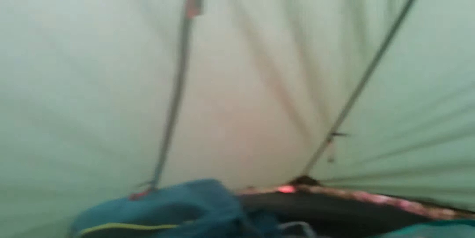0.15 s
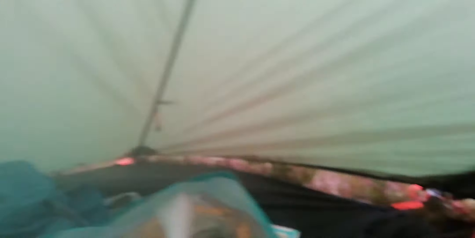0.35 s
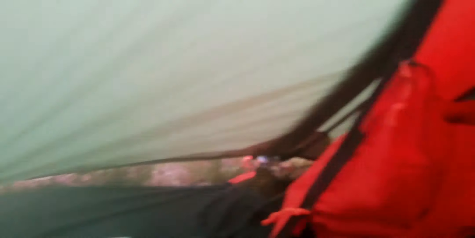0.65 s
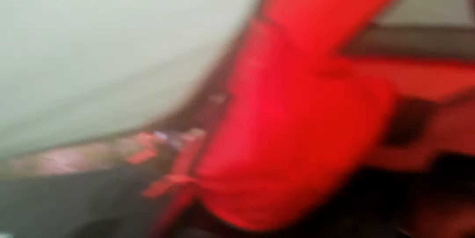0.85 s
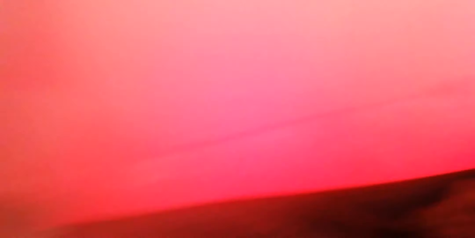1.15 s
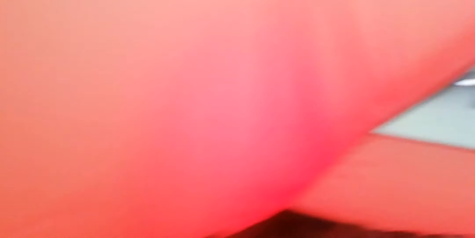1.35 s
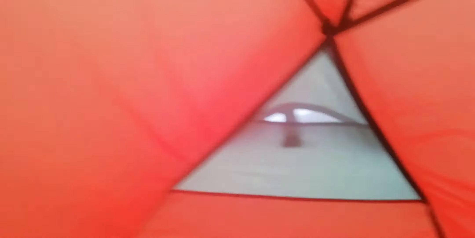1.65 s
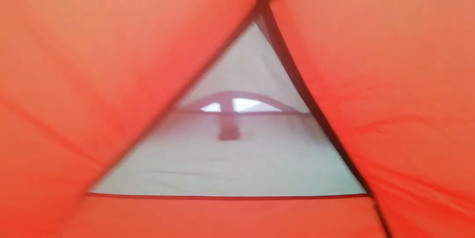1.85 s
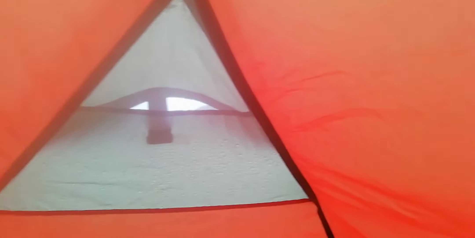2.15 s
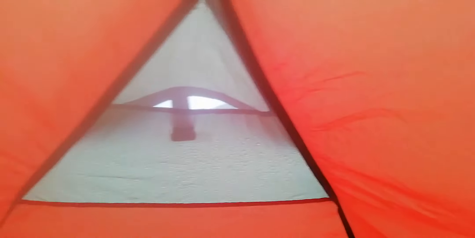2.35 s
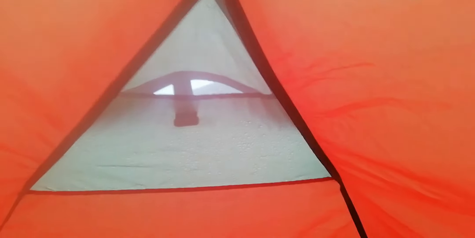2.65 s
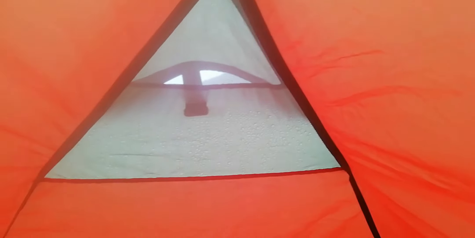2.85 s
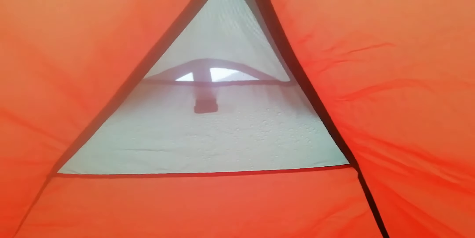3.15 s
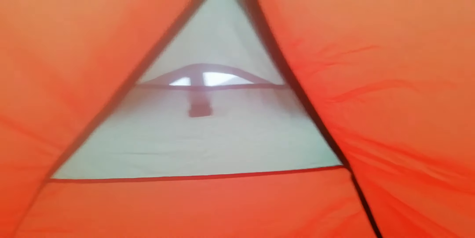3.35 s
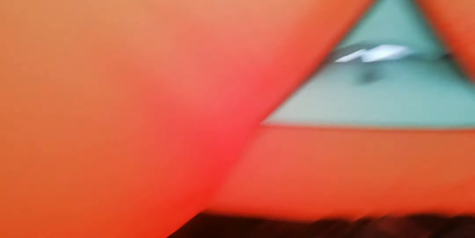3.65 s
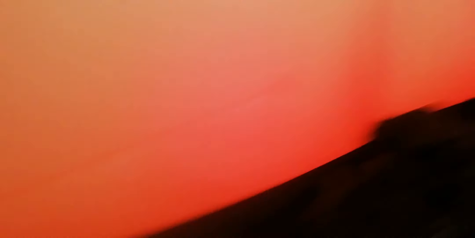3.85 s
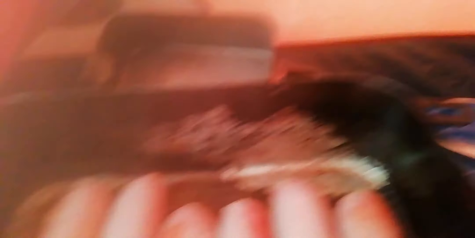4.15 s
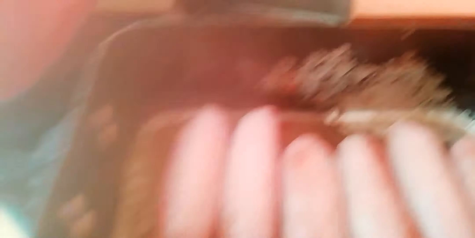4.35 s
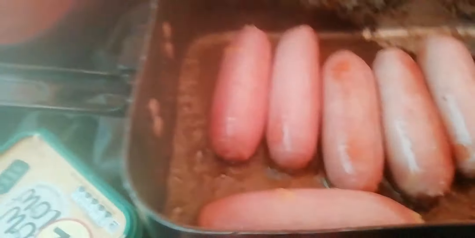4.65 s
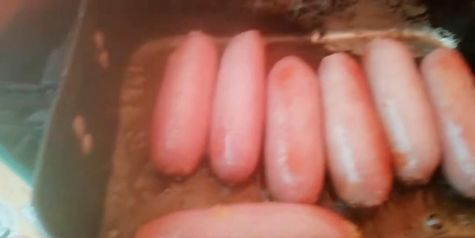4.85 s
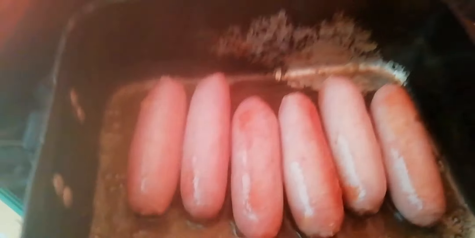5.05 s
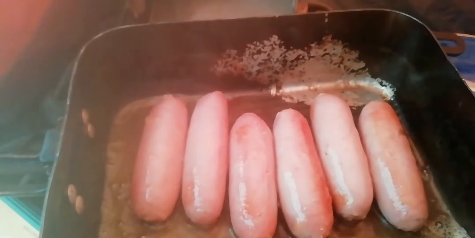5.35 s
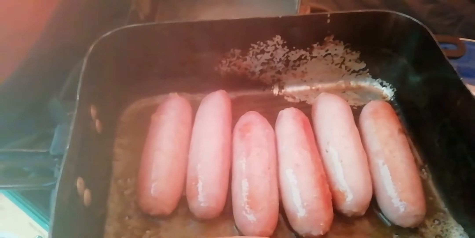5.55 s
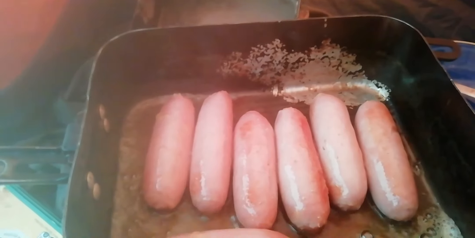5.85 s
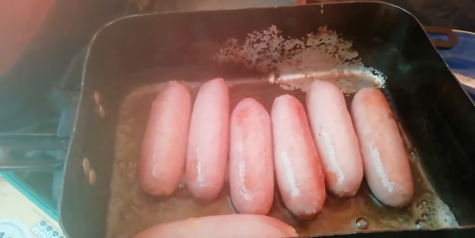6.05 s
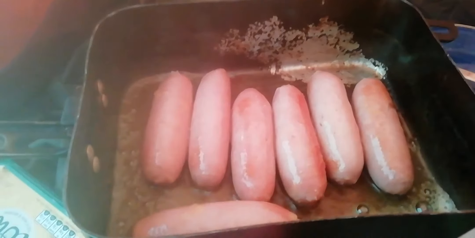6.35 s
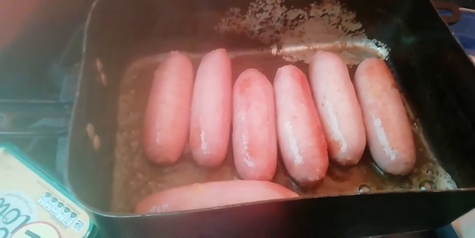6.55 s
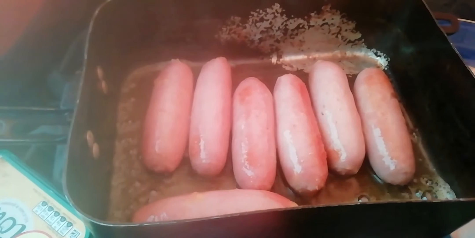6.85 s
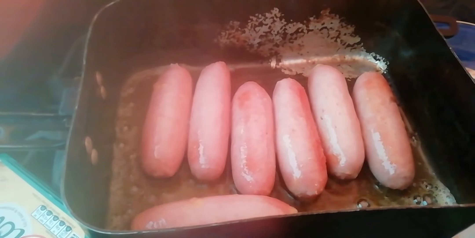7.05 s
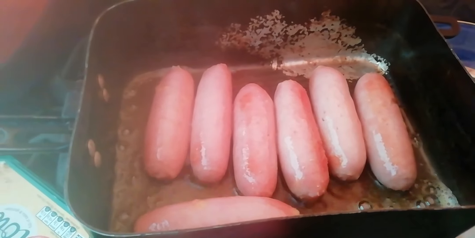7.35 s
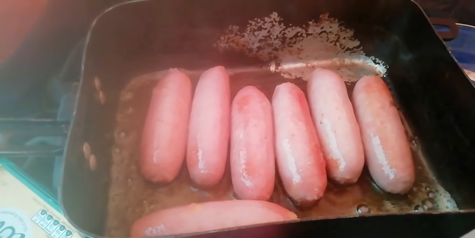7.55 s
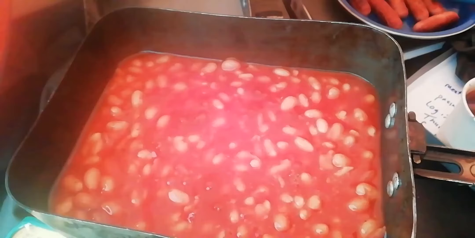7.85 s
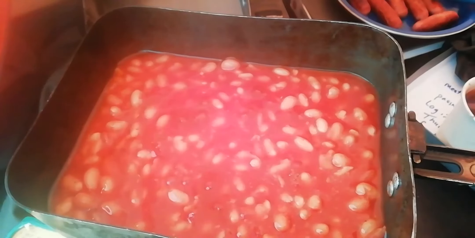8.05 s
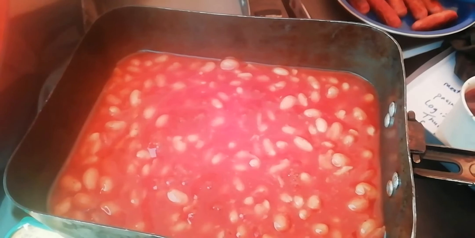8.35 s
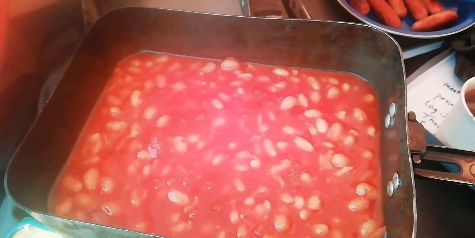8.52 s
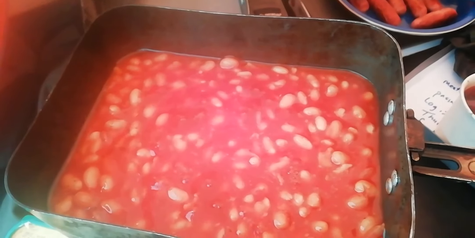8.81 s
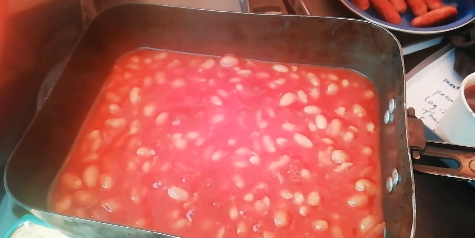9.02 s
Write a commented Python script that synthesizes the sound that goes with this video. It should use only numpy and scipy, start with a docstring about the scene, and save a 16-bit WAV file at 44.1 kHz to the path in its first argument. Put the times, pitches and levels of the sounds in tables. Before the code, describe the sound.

A hand-held phone inside a fabric tent. From 0 s a low, wavering gas flame roars under faint sizzling; frying and tiny sharp spits grow quickly, strongest around 1.0-1.25 s. At 1.3 s a soft low bump, then the sizzle falls away, dull and diffuse by way of the tent fabric, with a few isolated ticks and the flame's roar until 3.7 s. At about 3.9-4.0 s several low grip thumps over a short rumble; the sizzle jumps back, peaking near 4.3 s, close and brighter. Dense crackles, snaps and steamy hiss continue to 7.75 s with brief dips. Complete silence until 8.2 s. A very low swell dies away quickly and the burner alone remains to the end: deep roar, light hiss, faint thin whistles. Left is bright, right dull.

```python
"""Sausages fry on a gas camping stove inside a tent, heard by a hand-held phone.
First the phone turns to the pan: noise puffs make the sizzle, short bursts the spits, over a low flame roar.
Then it swings away and back, with grip thumps over handling rumble; the frying fades and returns brighter.
After a short silence a low swell dies away and only the burner is heard under a pot: roar, hiss, whistles.
The left microphone port is bright, the right one dull."""
import sys
import numpy as np
from scipy import signal
from scipy.fft import rfft, irfft
from scipy.io import wavfile
from scipy.ndimage import uniform_filter1d, map_coordinates

SR = 44100
rng = np.random.default_rng(int(sys.argv[2]) if len(sys.argv) > 2 else 0)


def transcribe(signal):
    """Save signal, clipped to [-1, 1], as a 16-bit WAV file at the path in sys.argv[1]."""
    frames = np.atleast_2d(signal).T
    limited = np.clip(frames, -1, 1)
    pcm = np.round(limited * 32767).astype(np.int16)
    wavfile.write(sys.argv[1], SR, pcm)


def voltage_ratio(level):
    """Linear amplitude factor for a level in decibels (scalar or array-like)."""
    return 10 ** (np.asarray(level, float) / 20)


N = 404838

# level course of the sizzle, before lulls and a final trim: time_s, level_db
SIZZLE_LEVEL = [(0.0, -45.5), (0.97, -38.5), (1.17, -37), (1.38, -43), (3.84, -41.5), (4.1, -36),
                (4.27, -30), (4.32, -36.5), (4.88, -33.5), (5.16, -34.5), (5.35, -32), (6.04, -36.5),
                (6.22, -33.5), (7.29, -36), (7.75, -35.5)]
# how squarely the phone faces the pan: time_s, share (0-1)
FACING_PAN = [(0, 0.08), (.4, 0.66), (.8, 0.57), (1.2, 0.96), (1.45, 0.3), (3.7, 0), (4, 0.93), (7.7, 0.92)]
# loudest spits of fat: start_s, level_db (relative), pitch_hz, length_ms
LOUD_SPITS = [(0.122, -36, 5030, 6), (0.1695, -33.5, 5460, 2.4), (0.219, -33, 7550, 3),
              (0.287, -35, 3950, 2), (0.479, -31, 4650, 1.5), (0.555, -28.5, 8800, 0.61),
              (0.599, -33, 4080, 2.8), (0.7953, -31.5, 4500, 3.4), (0.84, -30, 6800, 5.4),
              (0.8444, -25.5, 5000, 1.2), (0.8765, -32, 7200, 3), (0.902, -31.5, 5100, 2.5),
              (0.9578, -37, 4240, 3), (0.999, -21, 7500, 0.73), (1.008, -30.5, 4640, 3.8),
              (1.0382, -34, 4700, 3), (1.1055, -30.5, 9000, 1.8), (1.1392, -27, 2560, 1.8),
              (1.1543, -17.5, 8100, 0.6), (1.173, -23.5, 6200, 0.96), (1.181, -26, 8180, 1.7),
              (1.2128, -29, 8550, 2.9), (1.2587, -28, 9300, 2.5), (1.2943, -30, 2630, 1.8),
              (1.486, -28.5, 6800, 1.6), (1.7865, -34, 2960, 3.5), (2.32, -33.5, 4800, 2.1),
              (2.785, -34, 5980, 2.6), (3.028, -30.5, 6250, 1.9), (3.9093, -32, 7970, 1.4),
              (3.937, -27.5, 6130, 1.7), (3.9806, -27.5, 8770, 4.8), (4.0468, -23, 4500, 4.1),
              (4.0565, -27.5, 4160, 3.0), (4.0637, -19.5, 3880, 0.53), (4.067, -29.5, 2730, 5.0),
              (4.09, -19, 8100, 1.1), (4.1035, -24, 7500, 1.4), (4.128, -25.5, 8000, 1.2),
              (4.201, -25, 8840, 1.5), (4.22, -24, 8600, 2.3), (4.2247, -24, 4940, 1.2),
              (4.238, -23, 4060, 1.1), (4.255, -23.5, 7700, 2), (4.263, -26, 6800, 2.3),
              (4.3871, -28.5, 6860, 2), (4.4226, -28, 7600, 2), (4.5348, -26.5, 4140, 2.3),
              (4.599, -27, 1850, 3.7), (4.6216, -32, 5900, 1.2), (4.643, -24.5, 2660, 7.7),
              (4.6801, -25.5, 1970, 6), (4.715, -31, 5510, 6), (4.7267, -23, 5900, 1.7),
              (4.779, -24.5, 6000, 1.7), (4.875, -24.5, 8400, 1.1), (4.882, -26, 8300, 1.2),
              (4.9154, -28, 4800, 4), (4.9683, -28.5, 5550, 2), (5.0486, -28, 4430, 2.5),
              (5.1214, -25, 9000, 3.1), (5.1913, -28, 7900, 2), (5.2455, -24.5, 7000, 2.4),
              (5.2567, -28, 6900, 1.2), (5.34, -29, 4500, 3), (5.3519, -26.5, 7000, 3),
              (5.464, -25, 7920, 1.2), (5.4971, -32.5, 4287, 2), (5.5158, -26.5, 7800, 0.81),
              (5.5649, -29.5, 3870, 6.3), (5.5983, -24, 6060, 1.6), (5.642, -28, 4037, 2.8),
              (5.704, -24, 4600, 2.7), (5.8044, -31, 4660, 2.5), (5.8264, -29, 4440, 5.8),
              (5.8548, -35.5, 2260, 13), (5.8997, -29, 7900, 2), (5.9346, -27, 7644, 1.1),
              (6.0676, -32, 1640, 7.6), (6.1347, -26, 7530, 2), (6.156, -29.5, 3240, 3.2),
              (6.169, -25, 6590, 1.6), (6.2196, -17, 8600, 0.75), (6.3134, -25.5, 7840, 1.5),
              (6.3443, -23.5, 3850, 1.2), (6.3975, -25.5, 8090, 0.97), (6.426, -25, 7700, 1.1),
              (6.4396, -25.5, 5500, 3.8), (6.485, -22.5, 8400, 0.85), (6.496, -25.5, 6500, 0.83),
              (6.668, -24, 4587, 2.6), (6.7273, -29, 7550, 2), (6.747, -29.5, 4500, 3),
              (6.8411, -27.5, 7800, 2), (6.851, -26, 4700, 1.5), (6.921, -29.5, 5000, 2),
              (6.9898, -24, 8200, 2.7), (7.085, -21.5, 7990, 2), (7.129, -22, 8140, 1),
              (7.1815, -23.5, 3850, 2.2), (7.277, -22.5, 4170, 1.6), (7.302, -29, 8300, 5),
              (7.3465, -28, 7960, 2.9), (7.392, -21.5, 7900, 0.62), (7.407, -29.5, 4300, 4),
              (7.48, -36.5, 1600, 11), (7.528, -34.5, 5000, 3), (7.5847, -23.5, 5100, 1.5),
              (7.6158, -23.5, 6670, 1.9), (7.695, -29, 7960, 2), (7.74, -26.5, 6450, 3)]
# fingers shifting on the phone: centre_s, peak_db, pitch_hz
GRIP_THUMPS = [(1.302, -30, 65), (3.878, -19, 111), (3.936, -24, 167), (3.962, -19, 150), (4.003, -25, 99)]
# colour of the pan heard head-on (relative): frequency_hz, left_db_per_hz, right_db_per_hz
PAN_HEAD_ON = [(600, -88, -88), (1100, -79, -77), (1600, -76, -69), (2000, -77, -74), (2700, -73, -81),
               (3400, -71, -77), (4400, -65, -67), (5600, -65, -79), (7200, -63, -80), (8200, -62, -86),
               (9200, -65, -90), (10500, -77, -92), (12000, -82, -99), (15500, -92, -102)]
# colour of the pan heard by way of the tent fabric (relative): frequency_hz, left_db_per_hz, right_db_per_hz
PAN_ECHOED = [(350, -76.5, -78.5), (606, -76.5, -77), (910, -73.5, -73.5), (1270, -74, -75),
              (1660, -71, -71.5), (2200, -73, -74), (3500, -75, -82), (5770, -77.5, -90.5),
              (8300, -71, -97), (9300, -78.5, -99), (11230, -86.5, -106), (15400, -100, -114)]
# colour of the flame; its roar is levelled apart: frequency_hz, left_db_per_hz, right_db_per_hz
FLAME_COLOUR = [(38.3, -86.5, -86.5), (111, -70, -70.5), (288, -74, -74.5), (528, -90, -89.5),
                (940, -82, -81.5), (1500, -82.5, -82), (2040, -91.5, -84.5), (2730, -88.5, -91.5),
                (4500, -91.5, -96.5), (6000, -94, -104.0), (7200, -92, -108.0), (9000, -88, -109.0),
                (10100, -101.0, -113.0), (11500, -103.0, -114.0), (16000, -117.0, -120.0)]
# faint whistles of the gas jet: pitch_hz, width_hz, left_db, right_db
JET_WHISTLES = [(1900, 66, -59.5, -66.5), (6010, 120, -65, -83), (11450, 120, -80.5, -91.5)]
# how alike the two ports sound: frequency_hz, likeness (0-1)
PORT_LIKENESS = [(30, 0.77), (100, 1), (250, 0.97), (400, 0.57), (600, 0.11), (1200, 0.35), (4000, 0.047),
                 (9000, 0.15)]
# the silence: start_s, end_s
SILENCE_SPAN = (7.756, 8.218)
# brief dips of the sizzle: lowest_s, depth_db
SIZZLE_LULLS = [(4.83, 8), (5.31, 6.5), (5.44, 8), (6.25, 7.5), (6.58, 8), (7.47, 3.5)]
# level of the flame's upper roar: time_s, level_db
UPPER_ROAR_LEVEL = [(0.0, -43), (1.2, -50.5), (1.84, -42.5), (3.7, -46), (4.1, -49.5), (5.5, -47.5)]
# handling rumble: turn_s, db_at_turn, climb_db_per_s before the turn (negative sinks), fall_db_per_s after
HANDLING_RUMBLE = [(1.3, -53, -2, 110), (3.92, -34, 133, 123.5)]
# how much later the pan reaches the right port: time_s, lag_ms
PAN_LAG = [(0, 0.54), (3.7, 0.59), (4.2, 0.16)]

HZ = np.fft.rfftfreq(N, 1 / SR) + 1e-3
LULL_SINK_S, LULL_BACK_S = 0.081, 0.061
DEEP_ROAR_DB, DEEP_LIFT_DB = -47, 1.5   # phone turned away; added as it faces the pan
SMALL_SPITS, SMALL_SPIT_DB = 260, 2   # tries left to chance; least level over the sizzle's course
SNAP = 2.9   # first snap of a spit of 1 ms, over its noise
TICK_SHARE, TICK_FADE_DB_PER_MS = 0.61, 15.5   # bright opening tick of a spit of 1 ms; less for longer ones
BURNER_LEAD_MS = 0.58   # the flame reaches the right port first


def rms_one(x):
    """Bring a sound to an RMS of 1."""
    return x / np.sqrt(np.mean(x ** 2) + 1e-20)


def in_time(rows):
    """Draw every column of a time table as a curve over the scene."""
    s, *columns = np.transpose(rows)
    return [np.interp(np.arange(N) / SR, s, c) for c in columns]


def at_hz(points, hz):
    """Read every column of a colour table on a log-frequency axis."""
    table = np.array(points)
    return np.array([np.interp(np.log(hz), np.log(table[:, 0]), c) for c in table[:, 1:].T])


def drift(rate_hz):
    """Slow random wander of spread 1, made on every 40th sample."""
    pole = np.exp(-80 * np.pi * rate_hz / SR)
    noise = rng.standard_normal(N // 40 + 2002)
    slow = signal.lfilter([1], [1, -2 * pole, pole * pole], noise)[2000:]
    return np.interp(np.arange(N) / 40, np.arange(len(slow)), rms_one(slow))


def band(x, low_hz, high_hz, order=2):
    """Keep only the sound between two frequencies."""
    edges_hz = [low_hz, min(high_hz, .45 * SR)]
    return signal.sosfilt(signal.butter(order, edges_hz, "band", fs=SR, output="sos"), x)


def ports(pair):
    """Spectra at both ports: the right hears part of the left's sound, the rest by other paths."""
    first, other = rfft(pair)
    alike = np.clip(at_hz(PORT_LIKENESS, HZ)[0], 0, 1)
    return np.array([first, alike * first + np.sqrt(1 - alike ** 2) * other])


def coloured(spectra, colour):
    """Colour each port; from unit white noise, 0 dB per Hz gives a power of 1 per Hz."""
    return irfft(spectra * voltage_ratio(at_hz(colour, HZ)) * np.sqrt(SR / 2), N)


def later(pair, lag_ms):
    """Sound off to one side reaches the right port later, or earlier if the lag is negative."""
    read_at = np.arange(N) - lag_ms * SR / 1000
    return np.array([pair[0], map_coordinates(pair[1], [read_at], order=3, mode="nearest")])


def burner():
    """Turbulent flame: a low roar in two bands, gently wavering jet hiss above, faint whistles."""
    flame = coloured(ports(rng.standard_normal((2, N))), FLAME_COLOUR)
    spectra = rfft(flame)
    deep = irfft(spectra * (HZ < 190), N)
    upper = irfft(spectra * ((HZ >= 190) & (HZ < 480)), N)
    hiss = irfft(spectra * (HZ >= 480), N)
    deep_db = DEEP_ROAR_DB + DEEP_LIFT_DB * in_time(FACING_PAN)[0] + drift(0.98) + 1.2 * drift(3.6)
    upper_db = in_time(UPPER_ROAR_LEVEL)[0] + 1.1 * drift(7)
    out = hiss * voltage_ratio(1.5 * drift(24))
    out += rms_one(deep) * voltage_ratio(deep_db)
    out += rms_one(upper) * voltage_ratio(upper_db)
    for hz, width_hz, left_db, right_db in JET_WHISTLES:
        tone = band(rng.standard_normal((2, N)), hz - width_hz / 2, hz + width_hz / 2, order=1)
        out += rms_one(tone) * voltage_ratio([[left_db], [right_db]])
    return out


def thumps():
    """Grip shifts are soft pushes of about one cycle; a rumble sinks slowly, stops, then swells once."""
    pushes, handling, t = 0, 0, np.arange(N) / SR
    for s, peak_db, hz in GRIP_THUMPS:
        turns = hz * (t - s)
        pushes = pushes + voltage_ratio(peak_db) * np.cos(2 * np.pi * turns) * np.exp(-(turns / 0.49) ** 2)
    rumble = rms_one(band(irfft(ports(rng.standard_normal((2, N))), N), 30, 230, order=4))
    for s, turn_db, climb_db, fall_db in HANDLING_RUMBLE:
        handling = handling + voltage_ratio(turn_db - np.maximum(climb_db * (s - t), fall_db * (t - s)))
    return pushes + rumble * handling * voltage_ratio(3 * drift(8))


def lulls():
    """Level change in dB of the brief dips: each sinks and returns in straight lines."""
    t, change_db = np.arange(N) / SR, 0
    for s, depth_db in SIZZLE_LULLS:
        change_db = change_db + np.interp(t, [s - LULL_SINK_S, s, s + LULL_BACK_S], [0, -depth_db, 0])
    return change_db


def small_spits():
    """Lesser spits at random moments, heard apart mostly when the phone faces the pan."""
    when, kept, size, pitch, length = rng.random((SMALL_SPITS, 5)).T
    s = when * SILENCE_SPAN[0]
    sizzle_db = np.interp(s, *np.transpose(SIZZLE_LEVEL)) + lulls()[(s * SR).astype(int)]
    level_db = sizzle_db + SMALL_SPIT_DB + 2.8 * size
    pitch_hz = 3000 * 3.63 ** np.sqrt(pitch)
    rows = np.transpose([s, level_db, pitch_hz, 0.73 + 1.5 * length])
    heard_apart = kept < 0.2 + np.interp(s, *np.transpose(FACING_PAN))
    return [tuple(row) for row in rows[heard_apart]]


def spits():
    """A noise burst round its pitch, then a short spray; briefer or lower bursts crack more broadly."""
    out, ms = np.zeros((2, N + 2048)), np.arange(2048) / SR * 1000
    rows = LOUD_SPITS + small_spits()
    spray = rng.standard_normal((len(rows), 2, len(ms)))
    spit_hz = np.fft.rfftfreq(len(ms), 1 / SR) + 1
    heard = np.hypot(*voltage_ratio(at_hz(PAN_HEAD_ON, spit_hz))) * np.sqrt(SR / 8)
    spray_share = np.array([[.16], [.3]])   # the dull port hears more of the fabric's echo
    for (s, level_db, hz, length_ms), noise in zip(rows, spray):
        after = np.maximum(ms - length_ms, 0)
        body = voltage_ratio(-7 * np.minimum(ms / length_ms, 1) - 4.2 * after)
        burst = np.minimum(ms / 0.28, 1) * (body + spray_share * voltage_ratio(-2.2 * ms))
        noise = np.tanh(noise) * burst
        noise[:, 3] += SNAP / length_ms   # the skin of the bubble snaps
        crack = 0.46 / max(length_ms, .5) + 340 / hz
        spread = 1.114 + 450 / hz   # low bursts are broader
        pop = band(noise, hz / spread, hz * spread)
        pop += crack * (band(noise, 1300, 9000, order=1) + 0.26 * band(noise, 9300, 15700))
        tick = band(noise * voltage_ratio(-TICK_FADE_DB_PER_MS * ms), 8500, 15800)
        pop += TICK_SHARE / max(length_ms, .7) ** 2 * tick
        pop[1] *= np.std(pop[0]) / np.std(pop[1])
        # level each spit by its energy as coloured, so longer ones carry more
        energy = np.sum(np.abs(rfft(pop[0]) * heard) ** 2) * 2 / len(ms)
        gain = voltage_ratio(level_db) * np.sqrt((length_ms + 1.01) * SR / 1000 / energy)
        at = round(s * SR)
        out[:, at:at + len(ms)] += gain * pop
    return coloured(ports(out[:, :N]), PAN_HEAD_ON)


def sizzle():
    """Bursting steam bubbles: each puffs noise for a few ms near its own pitch; they come in clumps."""
    level_db = in_time(SIZZLE_LEVEL)[0] + lulls()
    steady_db = uniform_filter1d(level_db, round(.6 * SR))
    facing = np.clip(in_time(FACING_PAN)[0], 0, 1)
    white = rng.standard_normal((2, 2, N))
    edges_hz = 250 * 2 ** np.arange(0, 6.4, 1 / 3)
    clumps = voltage_ratio(4.2 * drift(14))
    sharp, smooth, below = 0, 0, 0
    for k, (low, high) in enumerate(zip(edges_hz, edges_hz[1:])):
        born = rng.random(N) < 110 * clumps / SR   # about 110 bubbles a second in each band
        sizes = born * voltage_ratio(4.4 * np.minimum(rng.exponential(1, N), 2.5))
        fade = voltage_ratio(-60 / (SR * (0.007 + 14 / low)))   # low bubbles ring longer
        # a burst spills into the band above
        puffs = rms_one(signal.lfilter([1], [1, -fade], sizes + 0.66 * below + 1e-18))
        below = sizes
        hiss = voltage_ratio(2.97 * drift(24))
        # bubbles stand out most from the hiss near 4 kHz
        depth = np.clip(min(np.log2(low / 450) / 3, np.log2(20000 / low) / 2.3), 0, 1)
        # quick swells and lulls belong to the bubbles
        noise = white[k % 2] * voltage_ratio(depth ** 2 * (level_db - steady_db))
        near = band(noise * (0.49 * hiss + depth * puffs), low, high)
        far = band(noise * (1.3 * hiss + 0.42 * depth * puffs), low, high)   # fabric echoes fill the gaps
        sharp = sharp + rms_one(near) * np.sqrt(high - low)
        smooth = smooth + rms_one(far) * np.sqrt(high - low)
    near, far = coloured(ports(sharp), PAN_HEAD_ON), coloured(ports(smooth), PAN_ECHOED)
    near, far = [v / np.std(band(v.mean(axis=0), 2000, 13000, order=4)) for v in (near, far)]
    return voltage_ratio(steady_db - 2.08) * (np.sqrt(facing) * near + np.sqrt(1 - facing) * far)


def scene():
    """Frying ends with the silence; flame and hand reach the right port first."""
    t = np.arange(N) / SR
    frying = (sizzle() + spits()) * (t < SILENCE_SPAN[1])
    return later(frying, in_time(PAN_LAG)[0]) + later(burner() + thumps(), -BURNER_LEAD_MS)


def low_pass(x):
    """Removes everything above the highest recorded frequency."""
    return signal.sosfilt(signal.butter(12, 16030, fs=SR, output="sos"), x)


def record(dry):
    """The sound drops out for a moment; on return the input settles with a low swell."""
    t = np.arange(N) / SR
    start_s, end_s = SILENCE_SPAN
    since = np.maximum(t - end_s, 0)
    settle = voltage_ratio(-47) * np.exp(-since / .08) * np.sin(2 * np.pi * 12 * since)
    on = np.clip(np.maximum(start_s - t, t - end_s) / 0.0011, 0, 1)   # 1.1 ms fades
    return low_pass((dry + settle) * on)


dry = scene()
out = record(dry)
transcribe(out)
```